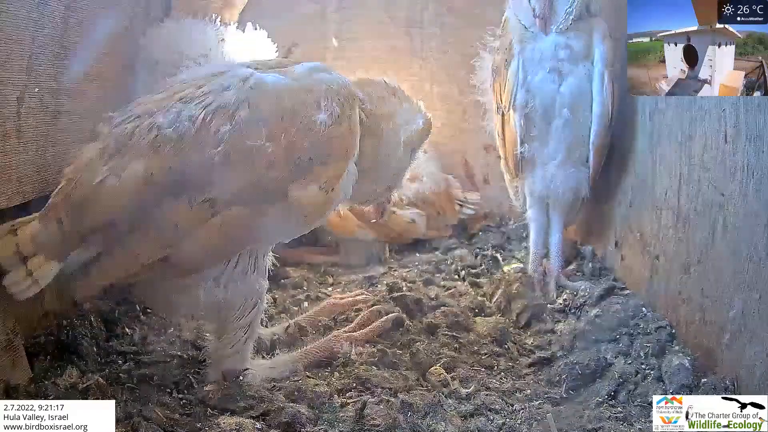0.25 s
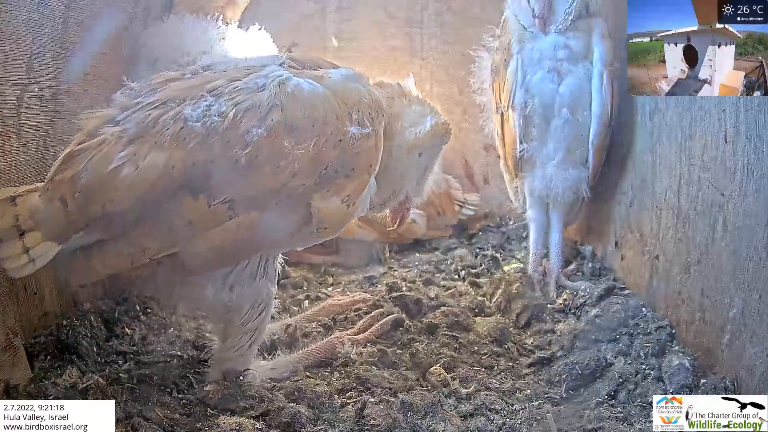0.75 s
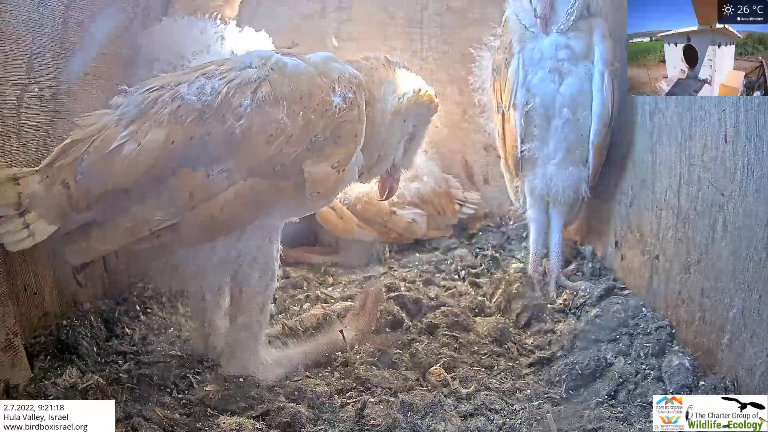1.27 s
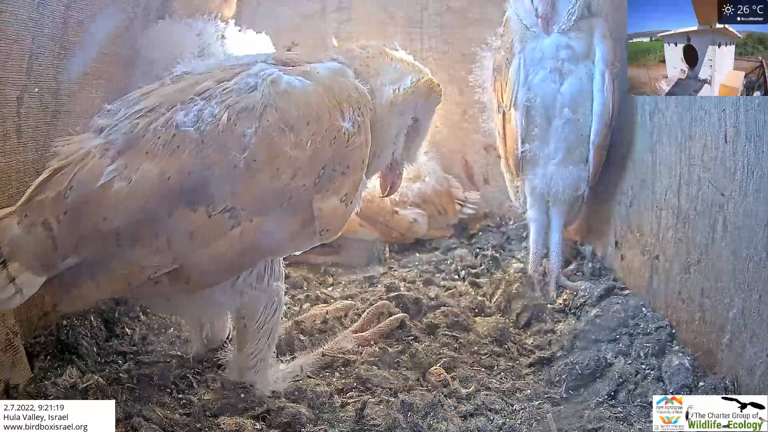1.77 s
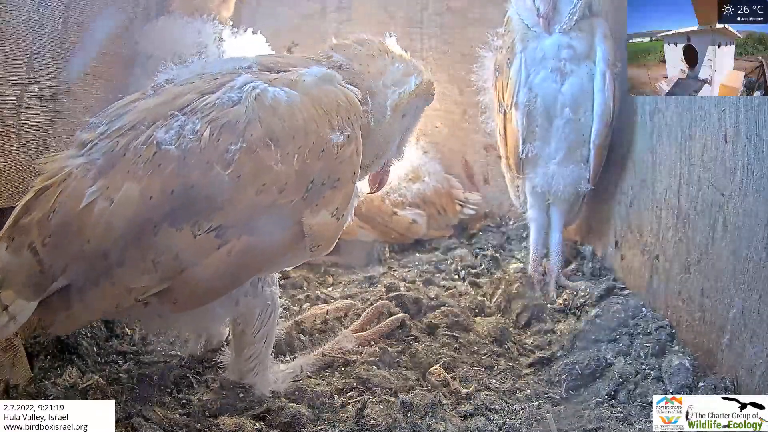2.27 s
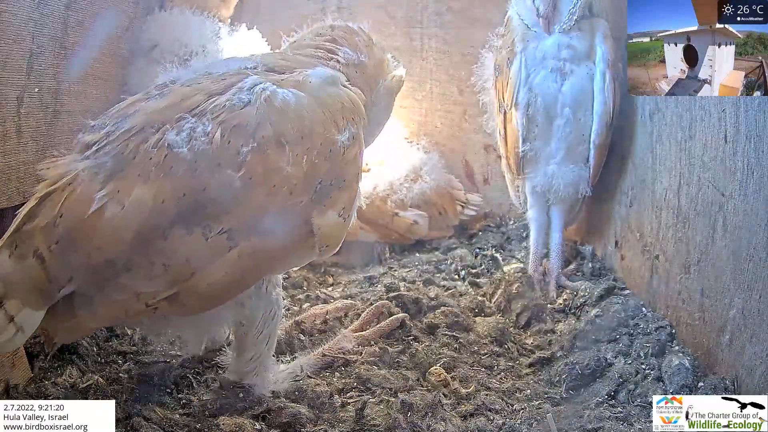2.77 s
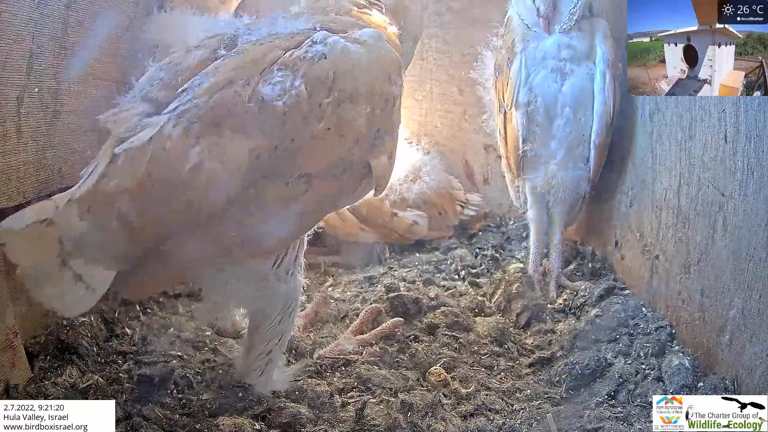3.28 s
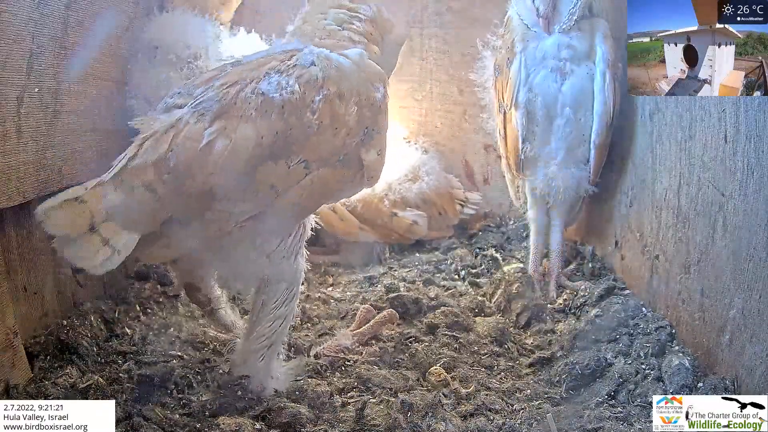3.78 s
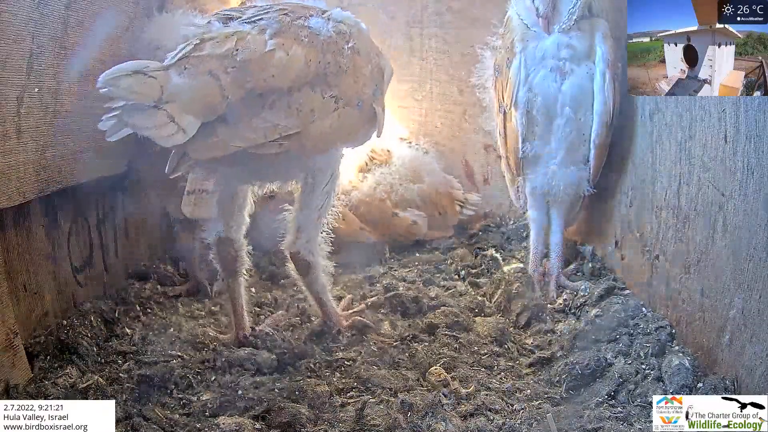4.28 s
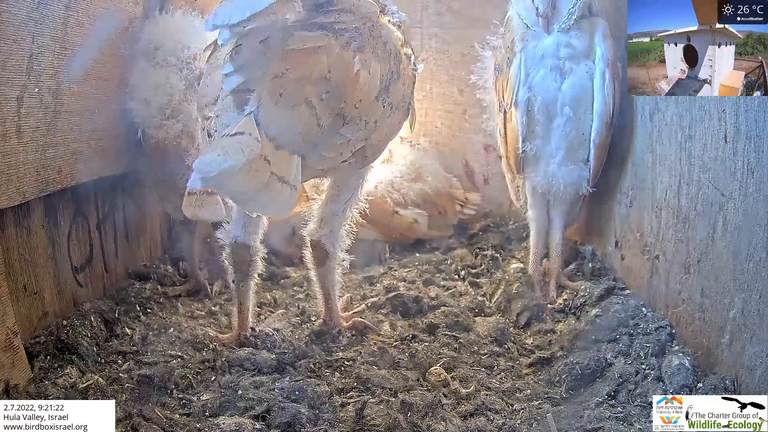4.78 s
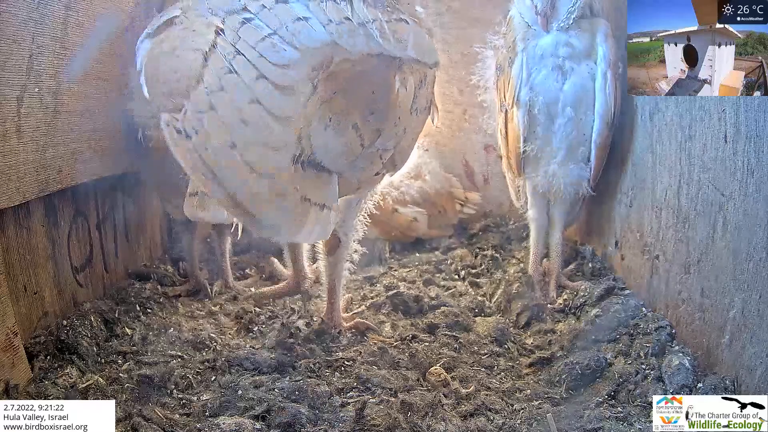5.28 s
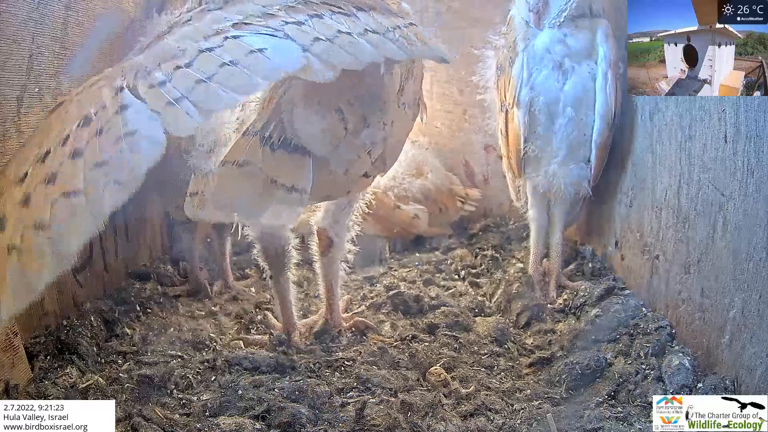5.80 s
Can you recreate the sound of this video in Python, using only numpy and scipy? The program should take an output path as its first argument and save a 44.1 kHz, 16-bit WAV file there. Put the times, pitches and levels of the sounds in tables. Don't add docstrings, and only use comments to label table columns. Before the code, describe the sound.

Low wooden thumps and crackling scratches come unevenly inside a hollow nest box, while a bird chirps thinly and regularly outside.

```python
import sys
import numpy as np
from scipy import signal
from scipy.fft import rfft, irfft
from scipy.io import wavfile
from scipy.ndimage import uniform_filter1d

SR = 44100
rng = np.random.default_rng(int(sys.argv[2]) if len(sys.argv) > 2 else 0)


def wrap_up_sound(samples):
    columns = np.atleast_2d(samples).T
    tamed = np.clip(columns, -1, 1)
    steps = np.round(tamed * 32767).astype(np.int16)
    wavfile.write(sys.argv[1], SR, steps)


def gain_from_db(level_db):
    decades = np.asarray(level_db, float) / 20
    return 10 ** decades


N = 266672


def evened(x):
    return x / np.sqrt(np.mean(x ** 2) + 1e-20)


def read(points, hz):
    f, value = np.transpose(points)
    return np.interp(np.log(hz + 1), np.log(f + 1), value)


def add(mix, s, sound):
    part = mix[round(s * SR):][:len(sound)]
    part += sound[:len(part)]


def coloured(db_of):
    hz = np.fft.rfftfreq(N, 1 / SR)
    white = rng.standard_normal(N)
    return evened(irfft(rfft(white) * gain_from_db(db_of(hz)), N))


def resonate(x, hz, width):
    turn = np.exp(2j * np.pi * np.cumsum(hz * np.ones(len(x))) / SR)
    r = np.exp(-np.pi * width / SR)
    return 2 * (turn * signal.lfilter([1 - r], [1, -r], x / turn)).real


def panel_ring(modes, place_db):
    t = np.arange(SR // 2) / SR
    return sum(way * gain_from_db(db + p - 60 * t / t60) * np.sin(2 * np.pi * hz * t)
               for (hz, db, t60, way), p in zip(modes, place_db))


def swells(rows, rise_s, fall_db_per_s, rest_db):
    t = np.arange(N) / SR
    level = gain_from_db(rest_db) * np.ones(N)
    for s, hold, db in rows:
        early_db = 20 * np.maximum(s - t, 0) / rise_s
        late_db = fall_db_per_s * np.maximum(t - s - hold, 0)
        level = np.maximum(level, gain_from_db(db - late_db - early_db))
    return level


# f/Hz, width/Hz, lift/dB
BOX_AIR = [(292, 56, -1.5), (357.2, 7.2, 11), (472, 9.2, 4), (502, 45, 4.5), (635, 100, 0), (723, 67, 5),
           (814, 14, 9.5), (1260, 210, 5.5), (1562, 310, 7), (1960, 230, 7), (2220, 460, 2.5),
           (3020, 470, 1.5)]


def lift_db(hz):
    return sum(db / (1 + (2 * (hz - f) / width) ** 2) for f, width, db in BOX_AIR)


# f/Hz, density level/dB
LEAK_SPECTRUM = [(15, -37.5), (25, -3), (113, -3), (178, -20), (297, -12), (400, -23), (510, -19),
                 (615, -23.5), (827, -30), (1050, -40), (1270, -38), (2120, -42), (2430, -33.5),
                 (8160, -43.5), (15600, -46)]


def leak():
    noise = coloured(lambda f: read(LEAK_SPECTRUM, f) + lift_db(f))
    hz, t, z = signal.stft(noise, SR, nperseg=512, noverlap=384)
    patches = uniform_filter1d(rng.standard_normal(z.shape), size=8, axis=0)
    patches = evened(uniform_filter1d(patches, size=16, axis=1))
    gusts = evened(uniform_filter1d(rng.standard_normal(len(t)), size=5))
    outdoor = 1 / (1 + (hz[:, None] / 6000) ** 4)
    drift_db = outdoor * (1.2 * patches + .6 * gusts)
    return gain_from_db(-62.5) * signal.istft(z * gain_from_db(drift_db), SR, nperseg=512, noverlap=384)[1][:N]


# f/Hz, density level/dB
SWAY_SPECTRUM = [(1.2, -40), (2.0, 6), (16, 8.5), (24, -16), (38, -16.5), (60, -22), (78, -30), (130, -120)]
# start t/s, hold/s, sway level/dB
GUSTS = [(.15, 0.13, -40), (.56, 0.11, -44.5), (.89, 0.18, -49), (1.22, 0.046, -46.5), (1.36, 0.16, -46),
         (1.75, 0.27, -54), (2.2, 0.26, -44.5), (2.62, 0.065, -50.5), (2.87, 0.027, -54.5),
         (3.3, .12, -53.5), (3.54, 0.065, -54.5), (4.12, 0.056, -52), (4.38, 0.058, -60), (4.65, 0.28, -58),
         (5.22, .03, -61.5), (5.38, .04, -56.5), (5.64, .03, -62), (5.9, .15, -62)]


def wind_sway():
    sway = coloured(lambda hz: read(SWAY_SPECTRUM, hz))
    sway /= np.sqrt(uniform_filter1d(sway ** 2, size=6000) + .1)
    return swells(GUSTS, rise_s=0.13, fall_db_per_s=90.5, rest_db=-64) * sway


def whistle(rows, partials_db, fuzz):
    s, hz, db, *tilt_db = np.transpose(rows)
    t = np.arange(s[0], s[-1], 1 / SR)

    def smooth(v):
        return uniform_filter1d(np.interp(t, s, v), size=120, mode="nearest")

    lead = np.argmax(partials_db)
    pitch_hz = smooth(hz) / (lead + 1)
    turns = np.cumsum(pitch_hz) / SR
    tilt_db = np.mean(tilt_db) if tilt_db else 0
    tone = np.zeros(len(t))
    for k, p in enumerate(partials_db):
        partial_db = p + tilt_db * max(k - lead, -1) + 1.4 * lift_db((k + 1) * pitch_hz)
        tone += gain_from_db(partial_db) * np.sin(2 * np.pi * (k + 1) * turns)
    flutter = 1 - fuzz + fuzz * evened(uniform_filter1d(rng.standard_normal(len(t)), size=70))
    return s[0], np.sqrt(2) * gain_from_db(smooth(db)) * tone * flutter * signal.windows.tukey(len(t), .15)


def echoes(x, t60):
    t = np.arange(SR // 3) / SR
    tail = rng.standard_normal(len(t)) * gain_from_db(-60 * t / t60) * (t > .004)
    return signal.fftconvolve(x, tail / np.linalg.norm(tail))[:N]


def off_peak(u, peak):
    return np.where(u < peak, 1 - u / peak, (u - peak) / (1 - peak)) ** 2


def warble_rows(s, length, start_hz, end_hz, db):
    u = np.linspace(0, 1, num=12)
    hz = start_hz + (end_hz - start_hz) * u
    return np.transpose([s + length * u, hz, db - 4 * off_peak(u, peak=0.7)])


# t/s, length/s, start f/Hz, end f/Hz, level/dB
WARBLES = [(0.829, 0.052, 4300, 3520, -74), (2.0, 0.014, 3940, 3760, -78), (2.055, 0.028, 3750, 3250, -79),
           (2.162, 0.055, 3990, 4050, -74.5), (2.214, 0.026, 3810, 3370, -75),
           (4.425, 0.07, 4200, 3820, -79), (4.481, .045, 3500, 3230, -76), (5.223, 0.033, 4450, 4250, -75),
           (5.258, 0.032, 3900, 3550, -74), (5.277, 0.03, 3330, 3200, -73),
           (5.664, .025, 3350, 3110, -75.5)]
# t/s, length/s, start f/Hz, end f/Hz, level/dB
PEEPS = [
    (.762, .022, 5050, 5000, -82),
    (1.78, .05, 5100, 5100, -82),
    (4.545, .062, 5290, 5250, -85),
    (5.16, .07, 3700, 3860, -82),
    (4.885, .065, 5265, 5240, -89),
    (5.93, .036, 5220, 5310, -84),
    (4.917, .022, 1790, 1950, -84),
]


def far_birds():
    far = np.zeros(N)
    for row in WARBLES:
        add(far, *whistle(warble_rows(*row), [0], fuzz=.55))
    for row in PEEPS:
        add(far, *whistle(warble_rows(*row), [0], fuzz=.35))
    return far + gain_from_db(-6) * echoes(far, t60=.15)


def chirp_rows(s, length, end_hz, db):
    u = np.linspace(0, 1, num=12)
    effort = db + 79
    hz = end_hz - (570 + 32 * effort) * (1 - u) ** 2.6
    swell_db = -14 * (1 - np.minimum(u / .3, 1)) ** 2 - 12 * np.maximum((u - .8) / .2, 0) ** 2
    tilt_db = -1.8 + .8 * effort + 0 * u
    return np.transpose([s + length * u, hz, db + 2.0 + swell_db, tilt_db])


def arch_rows(s, length, top_hz, db):
    u = np.linspace(0, 1, num=12)
    off = off_peak(u, peak=.5)
    hz = top_hz - np.where(u < .5, 1000, 690) * off
    return np.transpose([s + length * u, hz, db - 17 * off])


# t/s, length/s, third partial at end f/Hz, its level/dB
CHIRPS = [
    (1.059, .028, 4800, -79),
    (1.429, .03, 4760, -79),
    (1.894, .026, 4800, -79),
    (2.284, .033, 4850, -75),
    (2.7, .033, 4850, -70.5),
    (3.147, .034, 4800, -69),
    (3.628, .034, 4740, -70),
]
# t/s, length/s, top partial f/Hz, its level/dB
ARCH = (.268, .056, 4960, -74)
CHIRP_PARTIALS = [-17, -1.5, 0, -21]
ARCH_PARTIALS = [-30, -20, 0, -3]


def near_bird():
    near = np.zeros(N)
    for row in CHIRPS:
        add(near, *whistle(chirp_rows(*row), CHIRP_PARTIALS, fuzz=.08))
    add(near, *whistle(arch_rows(*ARCH), ARCH_PARTIALS, fuzz=.08))
    return near + gain_from_db(-16) * echoes(near, t60=.1)


# start t/s, hold/s, hum level/dB
SHUFFLES = [(.03, 0.23, -45.5), (.42, .1, -58), (.89, 0.1, -48.5), (1.13, 0.036, -57), (1.3, 0.22, -55),
            (1.55, 0.54, -59.5), (2.66, .04, -63), (2.96, 0.27, -63), (3.25, 0.16, -44.5),
            (3.42, 0.047, -53), (3.52, 0.11, -59), (3.79, 0.034, -47), (3.95, 0.049, -55),
            (4.09, 0.072, -44), (4.3, 0.15, -58), (4.73, 0.18, -59), (5.22, 0.026, -64), (5.5, .04, -61.5),
            (5.72, 0.16, -61)]


def shuffles():
    rub = rng.standard_normal(N)
    hum = evened(signal.fftconvolve(rub, panel_ring(FLOOR_PANEL[1:], np.zeros(5)))[:N])
    hum /= np.sqrt(uniform_filter1d(hum ** 2, size=2500) + .1)
    return gain_from_db(-7.5) * swells(SHUFFLES, rise_s=0.08, fall_db_per_s=104.5, rest_db=-72.5) * hum


# t/s, peak level/dB, length/ms, grit colour f/Hz, claw ring level/dB
CRUNCHES = [(0.036, -55.5, 23, 5000, -13), (.15, -59, 29, 5540, -6), (.839, -61, 6, 6200, -15),
            (0.878, -68, 7.7, 4000, 12), (0.8827, -56, 10.2, 4200, 20), (1.016, -66, 8, 4960, -6),
            (1.041, -61.5, 6, 2100, -3), (1.317, -52, 10.6, 5530, -5), (1.325, -64.5, 15, 2500, -3),
            (2.474, -56.5, 8.3, 6500, -11), (3.18, -44.5, 13.4, 6000, -7), (3.212, -59, 5, 8200, -9),
            (3.305, -64, 9, 7500, -21), (3.735, -62.5, 10, 5000, -1), (3.748, -51, 7.1, 5000, -14),
            (3.754, -54.5, 9, 6000, -12), (3.778, -61, 8, 6500, -5), (4.074, -52.5, 14, 5560, -5.5),
            (5.376, -62.5, 12, 5000, -3)]


def crunches():
    out = np.zeros(N)
    chance = rng.standard_normal((len(CRUNCHES), 2, 2000))
    t = np.arange(2000) / SR
    air = gain_from_db(1.5 * lift_db(np.fft.rfftfreq(2000, 1 / SR)))
    band = signal.butter(2, [1150, 11500], "band", fs=SR, output="sos")
    for (s, db, ms, hz, claw_db), (clicks, unevenness) in zip(CRUNCHES, chance):
        fall = np.minimum(t / .002, 1) * np.exp(-(t * 1000 / ms) ** 1.4 * 2)
        grit = clicks * gain_from_db(10 * uniform_filter1d(unevenness, size=12))
        litter = resonate(resonate(grit, hz, .9 * hz), hz, .9 * hz)
        claw = resonate(resonate(grit, 2900, 2000), 2900, 2000)
        thin = signal.sosfilt(band, evened(litter) + gain_from_db(claw_db) * evened(claw))
        add(out, s, gain_from_db(db - 11) * fall * irfft(rfft(thin) * air))
    return out


# f/Hz, level/dB, t60/s, direction of first swing
FLOOR_PANEL = [(46.3, -29, 0.58, -1), (95.7, -16.5, 0.33, -0.51), (112.9, -1, 0.12, -1.06),
               (128.8, 3, 0.062, 0.9), (149.6, -18, 0.37, -0.65), (157.5, -30.5, 0.65, 1)]
# f/Hz, level/dB, t60/s, direction of first swing
WALLS = [(207, -2, .24, 1), (230, -5, .12, -1), (285, -2, .08, 1), (330, -3, .1, -1), (348, -10, .16, 1)]
# f/Hz, level/dB, t60/s, direction of first swing
SMALL_PANELS = [(395, -4, .035, 1), (445, -5, .04, -1), (492, -2, .055, 1), (550, -1, .04, -1),
                (630, -5, .035, 1), (718, -5, .045, -1), (830, -10, .04, 1), (1300, -27, .02, -1)]
# t/s, blow level/dB, contact/ms, walls over floor level/dB, small panels over floor level/dB
STEPS = [(0.036, -26, 2.3, -29, -23), (0.049, -28, 5.3, -17, -37), (0.153, -36, 0.66, -16, -17.5),
         (0.264, -33.5, 5, -23, -45), (0.874, -52, 1.9, -6, -25), (0.88, -25.5, 3.36, -13, -15.5),
         (1.046, -31, 5, -22.5, -35), (1.318, -31.5, 3.2, -11.5, -16), (1.324, -51, 4.0, -23, -14),
         (1.784, -42, 4.2, -23, -47), (3.18, -19, 4.3, -12.5, -18.5), (3.307, -52, 3.9, -1.5, -13),
         (3.346, -65, 3.0, -18, -7), (3.747, -33, 7.4, -21, -15.5), (3.754, -32, 1.9, -14, -22),
         (3.955, -48.5, 6, -27, -37), (4.075, -29.5, 1.66, -16, -21.5), (5.377, -47.5, 3.4, -12, -12),
         (5.391, -54, 4, -10, -15), (5.51, -55.5, 4.0, -32, -28)]


def steps():
    out = np.zeros(N)
    place_db = 2.5 * rng.standard_normal((len(STEPS), 3, 8))
    skids = rng.standard_normal((len(STEPS), 500)) * np.exp(-np.arange(500) / (0.0028 * SR))
    tap = np.pad(np.hanning(24) / 12, (0, 476))
    for (s, db, ms, walls_db, small_db), p, skid in zip(STEPS, place_db, skids):
        push = np.hanning(max(round(ms * SR / 1000), 5))
        big = panel_ring(FLOOR_PANEL, p[0] / 2) + gain_from_db(walls_db + 4.0) * panel_ring(WALLS, p[1])
        claws = .5 * skid / np.linalg.norm(skid) + tap
        small = panel_ring(SMALL_PANELS, p[2])
        add(out, s - ms / 2000, gain_from_db(db + 4.5) * signal.fftconvolve(big, push / push.sum()))
        add(out, s, gain_from_db(db + small_db + 5.5) * signal.fftconvolve(small, claws))
    return out


def scene():
    outside = leak() + wind_sway() + far_birds() + near_bird()
    owls = shuffles() + crunches() + steps()
    return (outside + owls)[None]


def top_cut(x):
    return signal.sosfilt(signal.butter(12, 15710, fs=SR, output="sos"), x)


def record(dry):
    return top_cut(dry)


dry = scene()
out = record(dry)
wrap_up_sound(out)
```